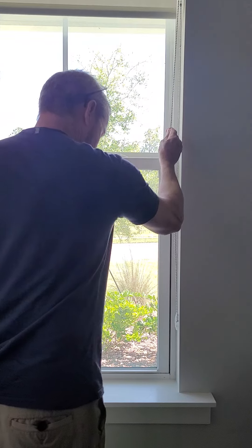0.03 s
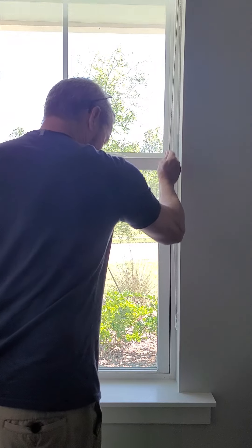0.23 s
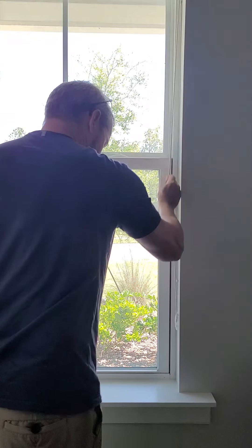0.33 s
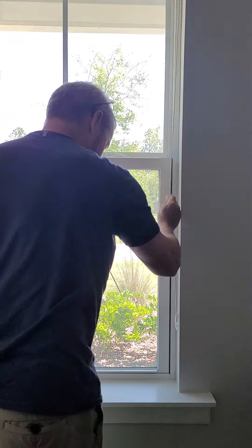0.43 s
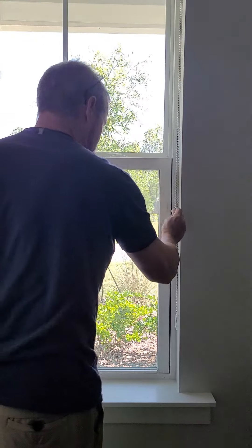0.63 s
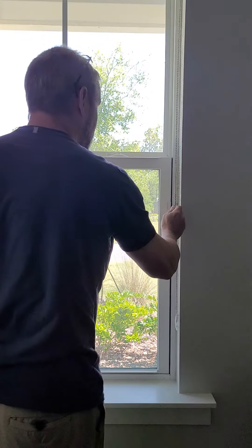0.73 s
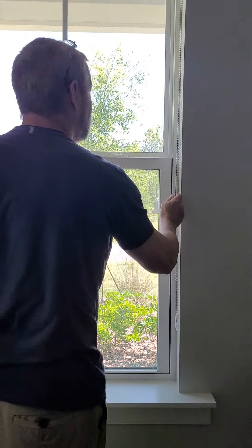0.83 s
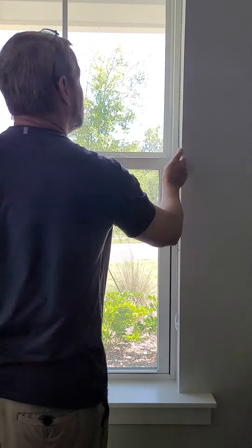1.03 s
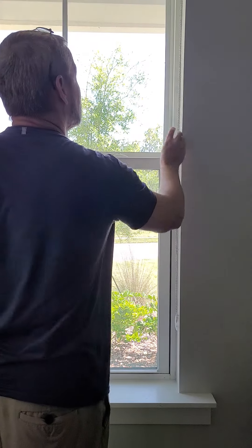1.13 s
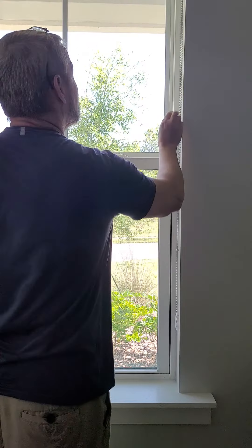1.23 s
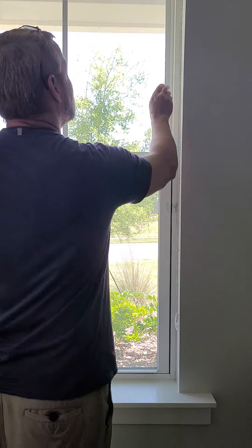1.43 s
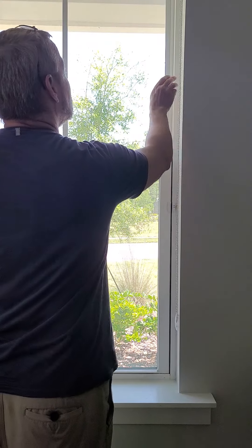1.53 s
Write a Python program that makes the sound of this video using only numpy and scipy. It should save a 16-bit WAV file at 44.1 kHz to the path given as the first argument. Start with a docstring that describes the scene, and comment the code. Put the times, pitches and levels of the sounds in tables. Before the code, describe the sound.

A metal bead chain tinkles softly, then from about 0.2 seconds rattles quickly through a roller shade's mechanism. At 0.6 seconds the shade thumps against its stop; the roller shudders and the shade gives a low flutter, fading by about 1.2 seconds. The slack chain jingles faintly and taps the window frame around 1.3 and 1.5 seconds. It is heard from across a bare room, slightly to the right.

```python
"""A roller shade in a bare room, heard in stereo from across the floor, a little to the right.
The metal bead chain tinkles, then is pulled taut and rattles over the sprocket of the clutch.
At 0.6 s the shade thumps against its stop; the roller shudders on and the hanging shade flutters.
The slack chain keeps jingling and, near the end, taps the window frame over faint room tone."""
import sys
import numpy as np
from scipy import signal
from scipy.fft import rfft, irfft
from scipy.io import wavfile

SR = 44100
rng = np.random.default_rng(int(sys.argv[2]) if len(sys.argv) > 2 else 0)


def unload_audio(sound):
    """Save the sound as a 16-bit wav file, at the path given as the first command line argument."""
    columns = np.transpose(np.atleast_2d(sound))
    # keep every value between -1 and 1, then stretch to whole-number steps
    steps = np.round(np.clip(columns, -1, 1) * 32767)
    wavfile.write(sys.argv[1], SR, steps.astype(np.int16))


N = 70560
TIME = np.arange(N) / SR

# Modes of roller and window frame. Each row: pitch in Hz, level in dB, ring time (T60) in seconds.
FRAME_MODES = [(233.4, -61, 0.31), (309, -55, 0.1), (355.8, -53, 0.52), (501.6, -55.5, 0.27),
               (651, -51.5, 0.12), (784.5, -50.5, 0.083), (855, -58, 0.35), (934, -68.5, 1)]
FRAME_WAVER_DB = 2.5   # the frame's ringing comes and goes
BEAD_T60_S, CLINK_SPREAD_DB = 0.017, 4.5


def clutch():
    """Bead after bead clicks over the sprocket while loose beads chatter beside it; returns both."""
    # Course of the rattle. Each row: time in seconds, level in dB.
    pull = [(.208, -66.5), (.214, -45), (.243, -31.5), (.25, -34.5), (.285, -35), (.385, -34.5),
            (.402, -32.5), (.425, -36), (.595, -34.5), (.64, -44), (.85, -61.5), (.93, -75)]
    # Colour of the clutch housing. Each row: frequency in Hz, gain in dB.
    housing = [(100, 2), (300, -4.5), (700, -1.5), (1600, -1.5), (2800, 3), (4300, 3), (5600, -8),
               (6500, 2.5), (7600, -10.5), (9300, -4), (11000, -14), (15500, -28)]
    # Its resonances. Each row: pitch in Hz, level in dB, ring time in seconds.
    modes = [(2075, -26.5, 0.015), (2900, -41, 0.033), (3570, -50.5, 0.11), (4205, -55.5, 0.039)]
    # The chain goes taut, the clutch snaps free and catches. Each row: start in seconds, level in dB.
    snaps = [(.2125, -16), (.2485, -0.5), (.259, -4), (.402, -7)]
    beads_per_s, jitter_s, spread_db = 106, 0.0009, 4
    loaded_db, gentle_hz = -32, 3500
    starts = np.arange(0, N / SR, 1 / beads_per_s)
    late, strength = rng.standard_normal((len(starts), 2)).T
    teeth = rms_one(clicks(np.c_[starts + jitter_s * late, spread_db * np.tanh(strength)]))
    chatter = from_db(-2) * contacts(per_s=800, spread_db=4)
    level = envelope(pull)
    gain = level / np.std(body(teeth + chatter, housing, modes))
    # A gently loaded clutch clicks duller.
    load = np.clip(level / from_db(loaded_db), 0, 1) ** 2
    teeth, chatter = (gain * (load * x + (1 - load) * soften(x, gentle_hz)) for x in (teeth, chatter))
    # Each bead excites the housing a little differently.
    return [body(x, housing, modes, waver_db=4) for x in (teeth + clicks(snaps), chatter)]


def beads():
    """The hollow beads strike one another and ring at two pitches, with a few clear clinks."""
    # Course of the jingle. Each row: time in seconds, level in dB.
    jingle_levels = [(0, -42.5), (.06, -55.5), (.243, -54), (.25, -27.5), (.30, -35.5), (.37, -30.5),
                     (.55, -34), (.62, -36), (.75, -46.5), (.97, -55), (1.07, -59), (1.14, -49.5),
                     (1.24, -60), (1.43, -57), (1.6, -59)]
    # The lower ring against the higher. Each row: time in seconds, relative level in dB.
    low_share = [(.22, -10.5), (.4, -8.5), (.58, -2.5), (.66, 2.5), (1.6, 3.5)]
    # Single clear clinks. Each row: start in seconds, level in dB.
    clinks = [(.010, -37), (.033, -30.5), (.099, -33.5), (.127, -32), (.175, -35), (.209, -32),
              (.524, -13.5), (.900, -44)]
    # Colour of the beads. Each row: frequency in Hz, gain in dB.
    bead_colour = [(1000, -8), (6300, -3.5), (7600, -7.5), (8400, 2), (9400, -2.5), (10500, -6),
                   (15000, -10)]
    high_hz, low_hz = 9186, 8510
    low = envelope(low_share)
    shimmer = waver(db=2.5)   # small swells of the swinging chain
    jingle = shimmer * (bead_ring(high_hz) + low * bead_ring(low_hz)) / np.sqrt(1 + low ** 2)
    clear = ring(clicks(clinks), high_hz, BEAD_T60_S)
    return colour(envelope(jingle_levels) * jingle + clear, bead_colour)


def bead_ring(hz, per_s=185, scatter_hz=103):
    """Beads of slightly different pitch clink at random, each a tick and a ring; unit rms."""
    pitches = hz + scatter_hz * np.linspace(-1, 1, 5)
    hits = [contacts(per_s / len(pitches), CLINK_SPREAD_DB) for _ in pitches]
    rings = sum(ring(hit, pitch, BEAD_T60_S) for hit, pitch in zip(hits, pitches))
    ticks = from_db(-0.5) * rms_one(sum(hits))
    return rms_one(rms_one(rings) + ticks)


def thump():
    """The shade hits its stop: one hard knock and softer rebounds ring through roller and frame."""
    # Knock and rebounds. Each row: start in seconds, level in dB, hardness as a cut-off in Hz.
    hits = [(.5984, 8.5, 3500), (0.6026, 0, 1400), (0.6134, 4, 3050), (0.6208, 4.5, 700),
            (0.639, -1.5, 2000), (.657, 0, 900), (.681, -4, 1200)]
    # Colour of the thump. Each row: frequency in Hz, gain in dB.
    thud = [(50, 2.5), (160, 1.5), (300, 4.5), (750, 4), (1200, 3), (2000, 1), (3000, -15), (6000, -26),
            (15000, -27)]
    knocks = sum(soften(clicks([(start, db)]), hz) for start, db, hz in hits)
    return body(knocks, thud, FRAME_MODES, FRAME_WAVER_DB)


def shudder():
    """The roller knocks loosely in its brackets; the clatter dulls to a rumble as it settles."""
    # Course of the shudder. Each row: time in seconds, level in dB.
    levels = [(.21, -77), (.258, -38), (.32, -52), (.56, -47.5), (.72, -40), (.78, -38), (.865, -39),
              (.90, -48), (1.08, -99), (1.10, -42), (1.17, -54), (1.22, -60), (1.39, -63), (1.415, -60),
              (1.6, -66)]
    # Colour of the roller. Each row: frequency in Hz, gain in dB.
    roller_colour = [(60, -10), (120, 4), (200, 5.5), (380, -0.5), (600, -4.5), (1100, -2), (1700, -9.5),
                     (4000, -20), (8000, -41)]
    settle_start_s, settle_s, soft_hz = 0.86, 0.026, 410
    hard = contacts(per_s=520, spread_db=0.5)
    soft = signal.sosfilt(signal.butter(2, soft_hz, fs=SR, output="sos"), hard)
    hardness = np.exp(-np.maximum(TIME - settle_start_s, 0) / settle_s)
    knocks = envelope(levels) * (hardness * hard + np.sqrt(1 - hardness ** 2) * soft)
    hard_rms = np.std(body(hard, roller_colour, FRAME_MODES))
    return body(knocks, roller_colour, FRAME_MODES, FRAME_WAVER_DB) / hard_rms


def taps():
    """The slack chain taps the window frame: a few beads land at random just after the first."""
    # The taps. Each row: start in seconds, level in dB, hardness as a cut-off in Hz.
    hits = [(1.285, -23, 18000), (1.290, -13, 2000), (1.317, -7, 1190), (1.331, -22.5, 2200),
            (1.525, -14, 2020), (1.53, -15, 1790)]
    # Colour of a tap. Each row: frequency in Hz, gain in dB.
    tap_colour = [(150, -20.5), (700, -4), (1100, -4), (1650, 3), (3500, 6.5), (5600, -0.5), (15500, -14.5)]
    scatter_s, followers_db = 0.002, -5.5
    out = 0
    for start, db, hz in hits:
        fade = (TIME > start) * np.exp(-abs(TIME - start) / scatter_s)
        followers = fade * contacts(per_s=2800, spread_db=CLINK_SPREAD_DB)
        followers *= from_db(db + followers_db) / np.linalg.norm(followers)
        out = out + soften(clicks([(start, db)]) + followers, hz)
    return colour(out, tap_colour)


def flutter():
    """The hanging shade vibrates in deep, wavering swells."""
    # The swells. Each row: crest time in seconds, length in seconds, level in dB, pitch in Hz.
    swells = [(0.334, 0.18, -34.5, 70), (0.588, .32, -40.5, 58.6), (0.833, 0.26, -42, 67.5),
              (1.156, 0.2, -52, 70.3)]
    out = 0
    for crest, length, db, hz in swells:
        swell = np.cos(np.pi * np.clip((TIME - crest) / length, -.5, .5))
        out = out + from_db(db) * swell * np.sin(2 * np.pi * hz * (TIME - crest))
    return np.sqrt(2) * waver(db=2) * out


def room(x, direct_db, wet_db, pan_db):
    """At the microphones: direct sound, dense early reflections and a tail that dies band by band."""
    # Reverberation of the bare room. Each row: frequency in Hz, decay time (T60) in seconds.
    room_t60 = [(100, 0.73), (400, 0.82), (3500, 0.77), (14000, 0.16)]
    early_db, early_t60_s = 9.5, 0.15
    wall_delay_s, right_lag_s = 0.002, 0.0002177
    noise = rfft(diffuse_noise())
    hz = np.fft.rfftfreq(N, 1 / SR)
    centres = np.geomspace(100, 15000, 8)
    early = from_db(early_db) * np.exp(-np.log(1000) * TIME / early_t60_s)
    response = 0
    for centre, weights in zip(centres, np.eye(len(centres))):
        band = irfft(noise * at_hz(list(zip(centres, weights)), hz), N)
        tail = np.exp(-np.log(1000) * TIME / at_hz(room_t60, centre))
        fade = (early + tail) * (TIME > wall_delay_s)
        response = response + band * fade / np.linalg.norm(fade)
    wet = signal.fftconvolve(x[None], response, axes=1)[:, :N]
    direct = np.array([x, np.interp(TIME - right_lag_s, TIME, x)])
    balance = from_db([[pan_db / 2], [-pan_db / 2]])
    return (from_db(direct_db) * direct + from_db(wet_db) * wet) * balance


def room_tone(level_db=-60.5):
    """The steady, faint air of the room."""
    # Colour of the air. Each row: frequency in Hz, gain in dB.
    air = [(25, 3.5), (65, 6.5), (130, 4), (300, -17.5), (1200, -15.5), (2100, -9.5), (3500, -11),
           (7500, -23.5), (15500, -51)]
    return from_db(level_db) * rms_one(np.array([colour(side, air) for side in diffuse_noise()]))


def diffuse_noise():
    """Noise from all around, alike at both microphones only in the bass."""
    # Likeness of left and right. Each row: frequency in Hz, correlation.
    likeness = [(70, 0.99), (450, 0.79), (1200, 0.057), (2500, 0.17), (9000, -0.034)]
    alike = at_hz(likeness, np.fft.rfftfreq(N, 1 / SR))
    mid, side = rfft(rng.standard_normal((2, N)))
    return irfft(np.sqrt((1 + alike) / 2) * mid + np.sqrt((1 - alike) / 2) * side * [[1], [-1]], N)


def body(x, points, modes, waver_db=0):
    """Contacts heard through a body: its modes, each wavering on its own, and its broad colour."""
    ringing = sum(from_db(db) * waver(waver_db) * ring(x, hz, t60) for hz, db, t60 in modes)
    return colour(x + ringing, points)


def ring(x, hz, t60):
    """A unit click sets a sine of height 1 ringing."""
    r = np.exp(-np.log(1000) / (t60 * SR))
    w = 2 * np.pi * hz / SR
    return signal.lfilter([1, -r * np.cos(w)], [1, -2 * r * np.cos(w), r * r], x + 1e-18)


def colour(x, points):
    """Causal (minimum-phase) filter through the given (Hz, dB) points."""
    size = 8192
    gains = from_db(at_hz(points, np.fft.rfftfreq(size, 1 / SR)))
    cepstrum = irfft(np.log(gains))
    cepstrum[1:size // 2] *= 2
    cepstrum[size // 2 + 1:] = 0
    return signal.fftconvolve(x, irfft(np.exp(rfft(cepstrum))))[:N]


def clicks(rows):
    """One click for each (seconds, dB) row."""
    starts, db = np.transpose(rows)
    return np.bincount(np.clip(starts * SR, 0, N).astype(int), from_db(db), N + 1)[:N]


def contacts(per_s, spread_db):
    """Random contacts of uneven strength; unit rms."""
    struck = rng.random(N) < per_s / SR
    strength = from_db(spread_db * np.clip(rng.standard_normal(N), -2, 2))
    return rms_one(struck * strength * rng.choice([-1, 1], N))


def soften(x, hz):
    """A soft contact: one-pole low-pass."""
    r = np.exp(-2 * np.pi * hz / SR)
    return signal.lfilter([1 - r], [1, -r], x + 1e-18)


def waver(db):
    """A gain that wanders slowly by about this many decibels."""
    drift = signal.sosfilt(signal.butter(2, 15, fs=SR, output="sos"), rng.standard_normal(N))
    return from_db(db * rms_one(drift))


def envelope(rows):
    """Gain over time, from (seconds, dB) rows joined by straight lines."""
    times, db = np.transpose(rows)
    return from_db(np.interp(TIME, times, db))


def at_hz(points, hz):
    """Read a table on a log-frequency axis."""
    frequencies, values = np.transpose(points)
    return np.interp(np.log(np.maximum(hz, 1)), np.log(frequencies), values)


def from_db(db):
    """Decibels to gain."""
    return 10 ** (np.asarray(db) / 20)


def rms_one(x):
    """Scale to unit rms."""
    return x / np.sqrt(np.mean(x ** 2) + 1e-20)


def scene():
    """Chain and roller are across the room, a little louder on the right; the flutter is centred."""
    return (sum(room(part, direct_db=-2.5, wet_db=5.0, pan_db=-3.5) for part in clutch())
            + room(beads(), direct_db=-5, wet_db=-2.5, pan_db=-2.0)
            + room(thump(), direct_db=-1.5, wet_db=6.0, pan_db=-2.0)
            + room(shudder(), direct_db=-1, wet_db=-5.5, pan_db=-2.0)
            + room(taps(), direct_db=-10.5, wet_db=3, pan_db=-4)
            + flutter() + room_tone())


def record(dry):
    """The recorder rolls off the deepest rumble and cuts the top steeply."""
    low_cut_hz, high_cut_hz = 28, 15700
    dry = signal.sosfilt(signal.butter(2, low_cut_hz, "high", fs=SR, output="sos"), dry)
    return signal.sosfilt(signal.ellip(12, .1, 80, high_cut_hz, fs=SR, output="sos"), dry)


dry = scene()
out = record(dry)
unload_audio(out)
```